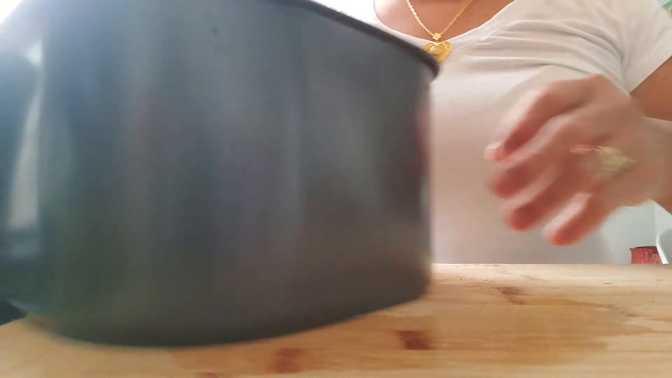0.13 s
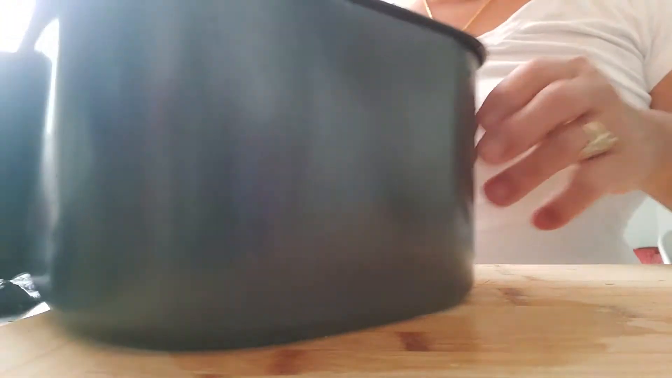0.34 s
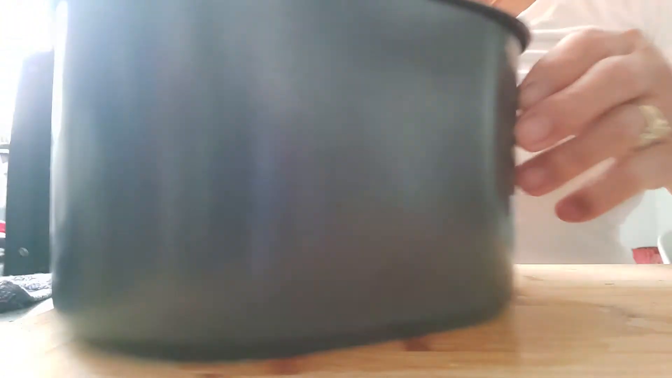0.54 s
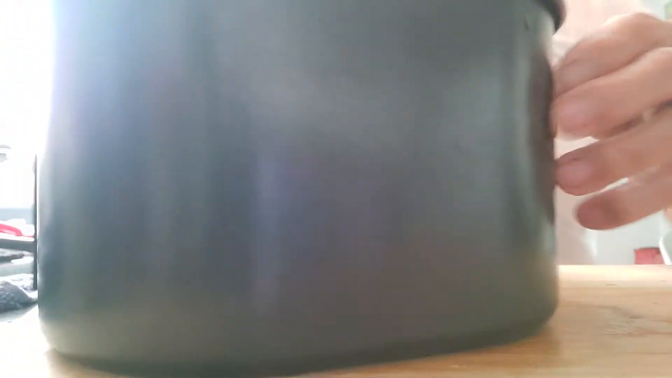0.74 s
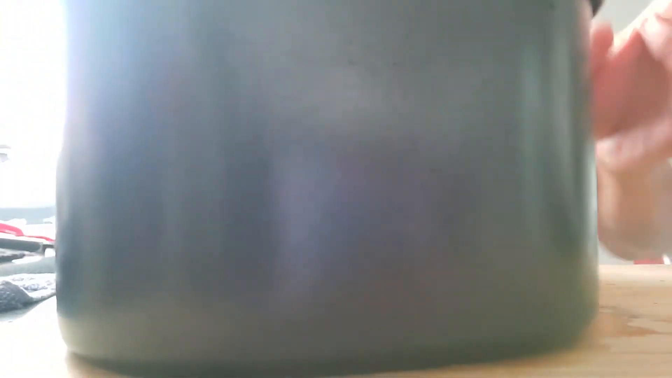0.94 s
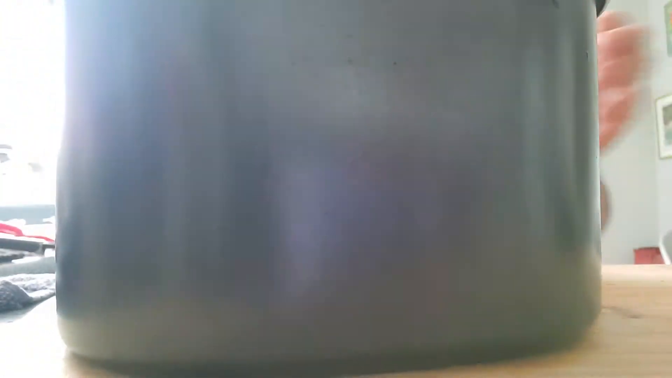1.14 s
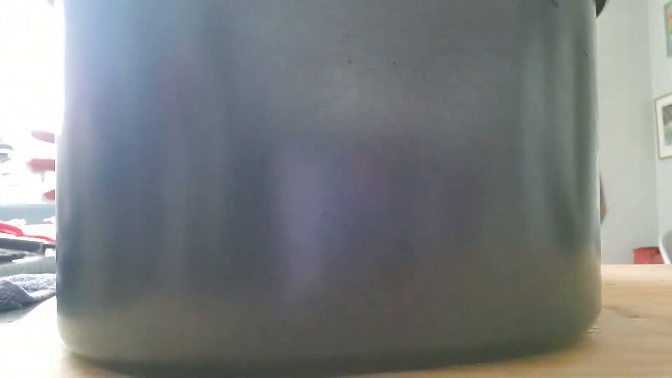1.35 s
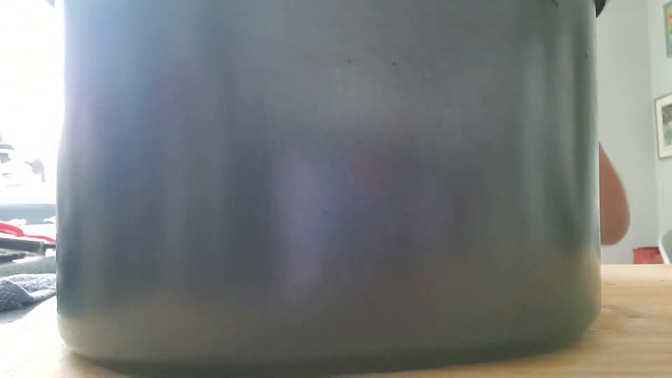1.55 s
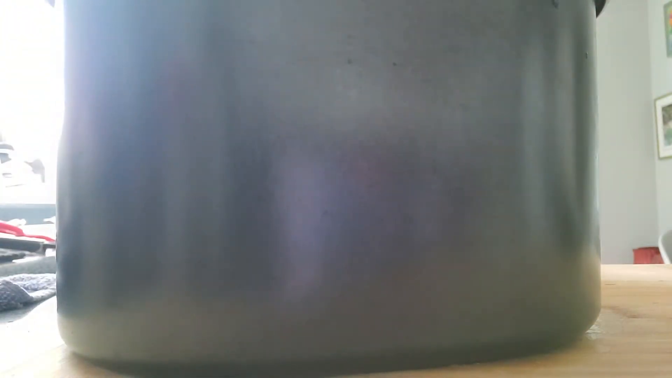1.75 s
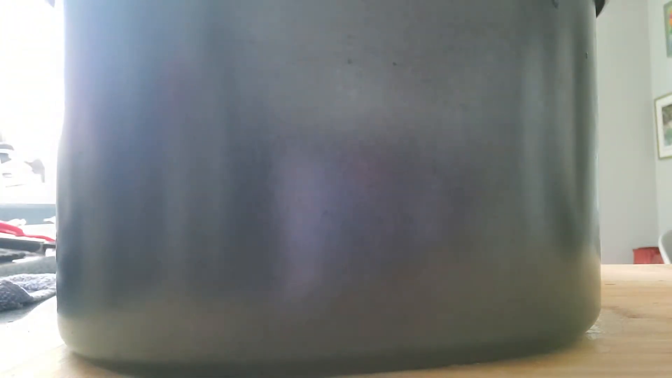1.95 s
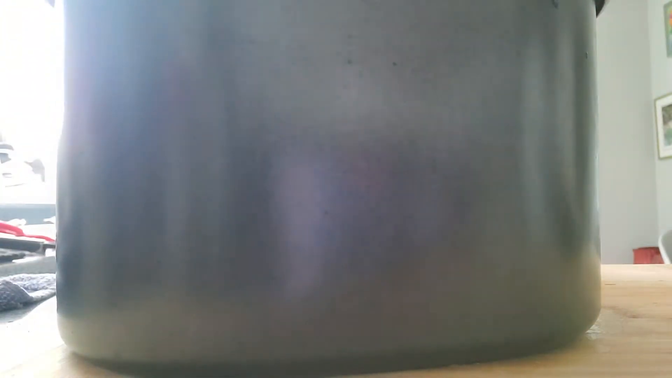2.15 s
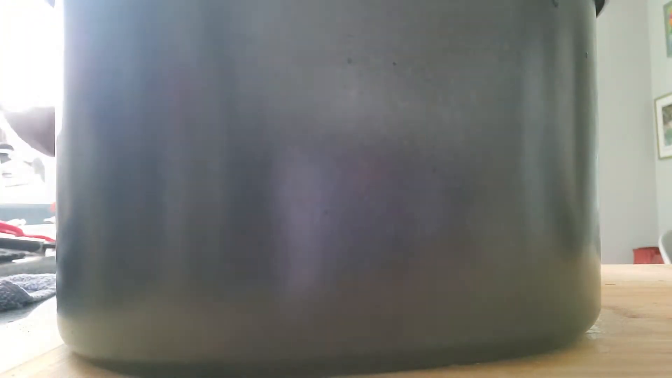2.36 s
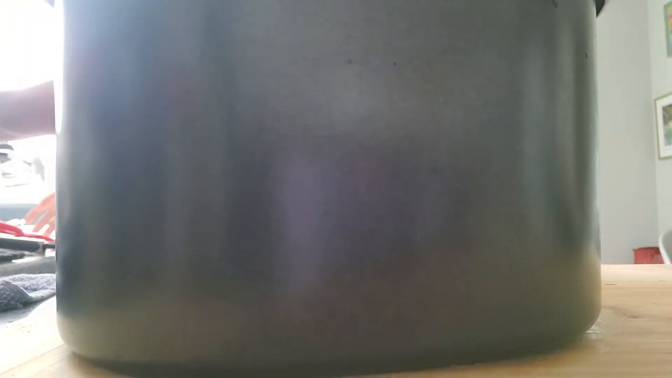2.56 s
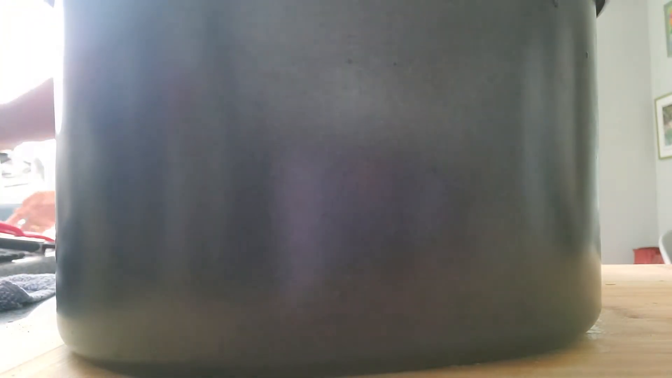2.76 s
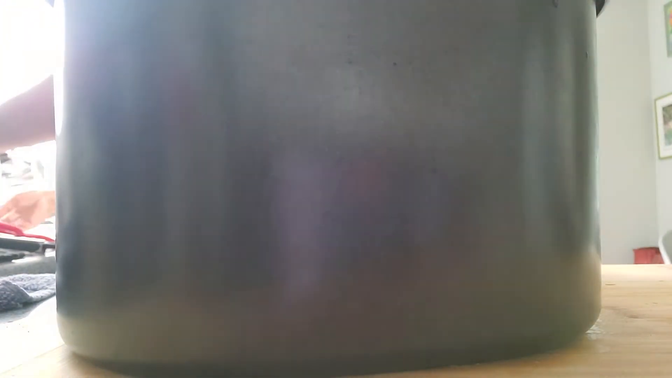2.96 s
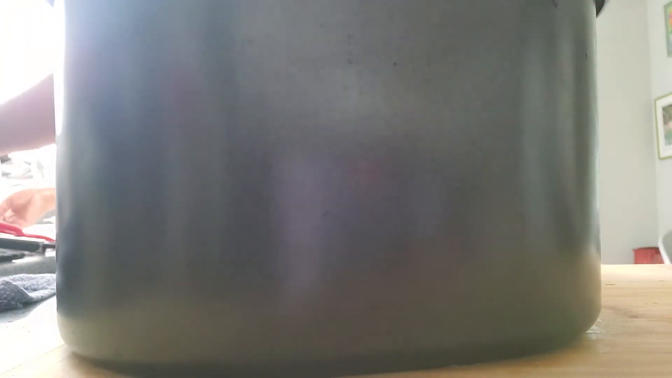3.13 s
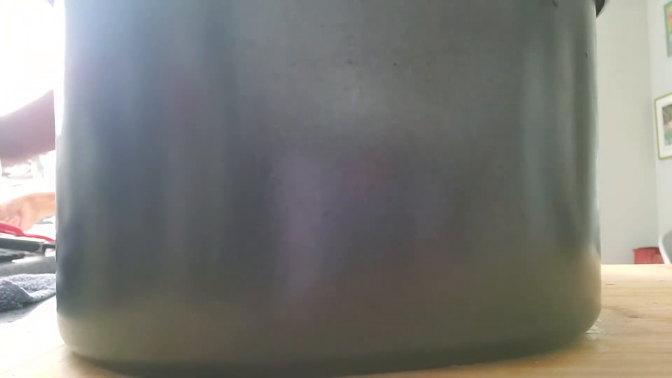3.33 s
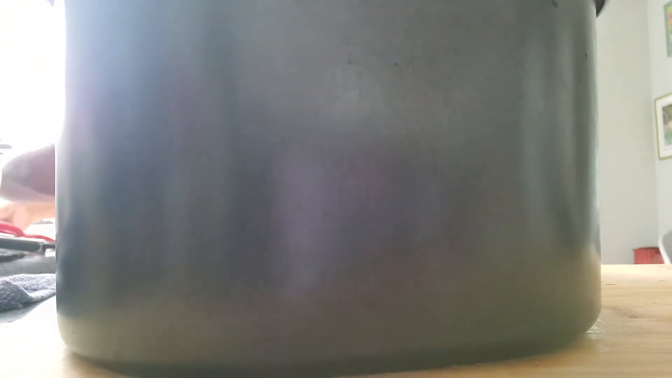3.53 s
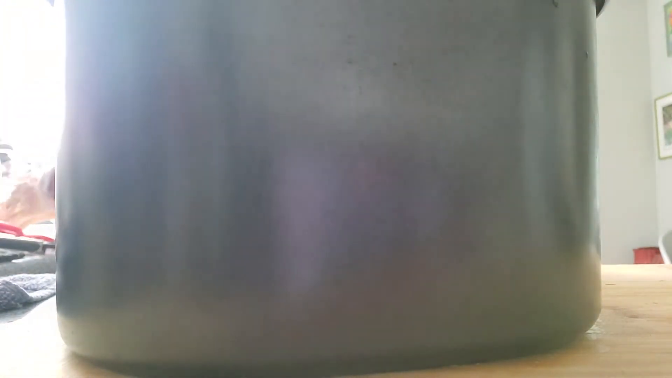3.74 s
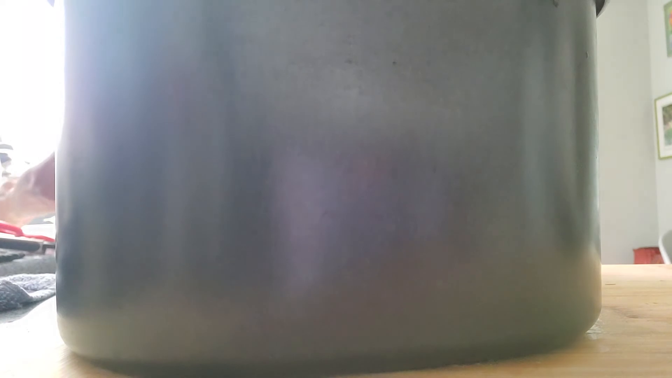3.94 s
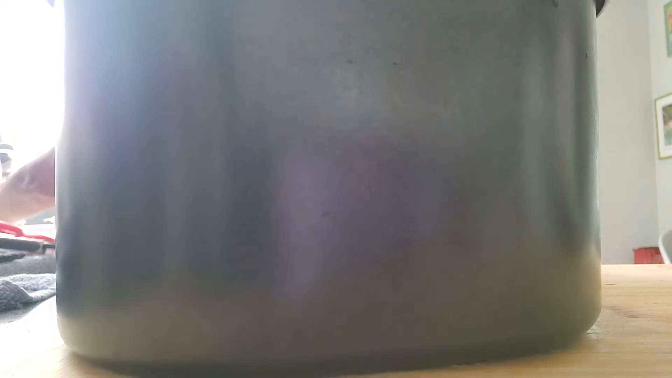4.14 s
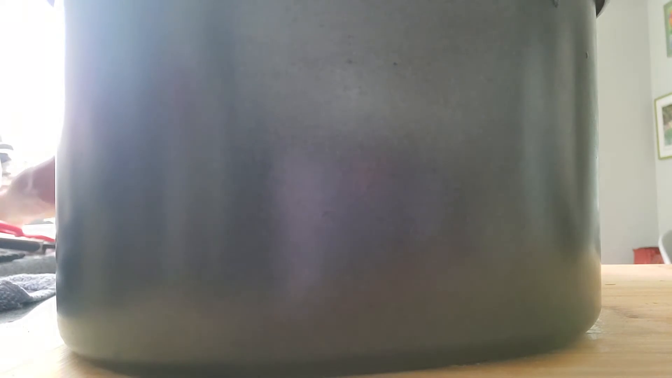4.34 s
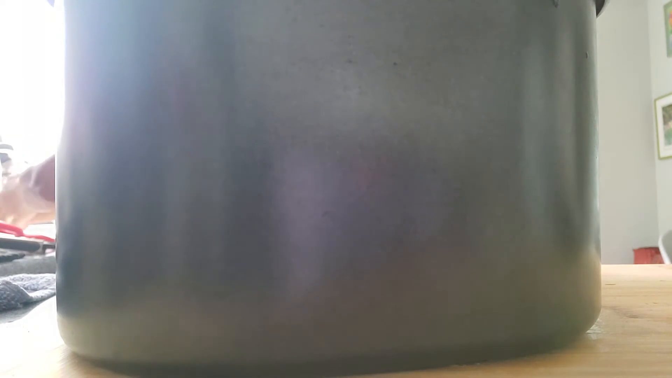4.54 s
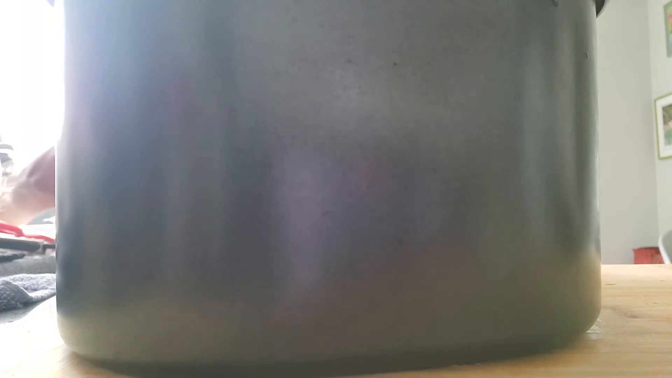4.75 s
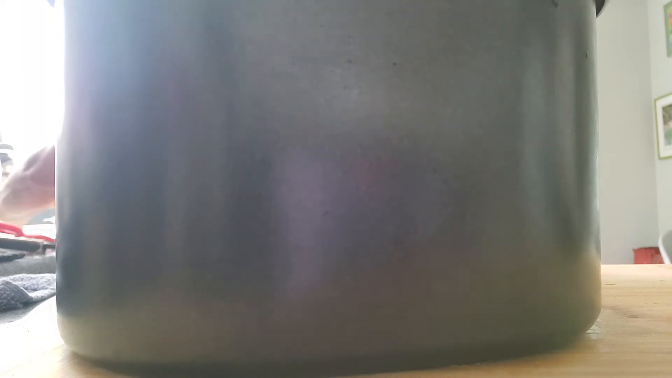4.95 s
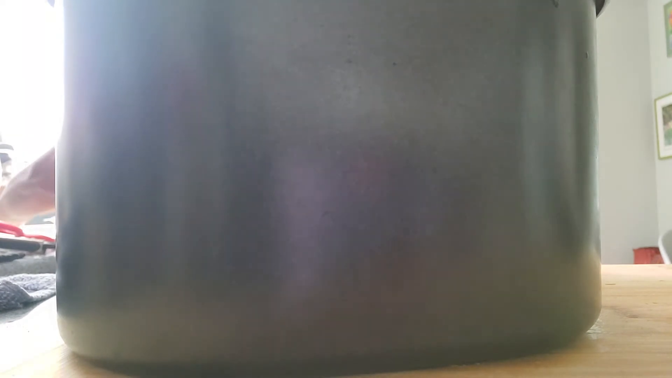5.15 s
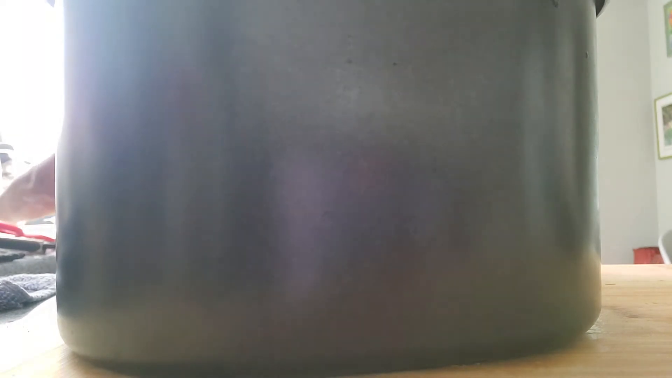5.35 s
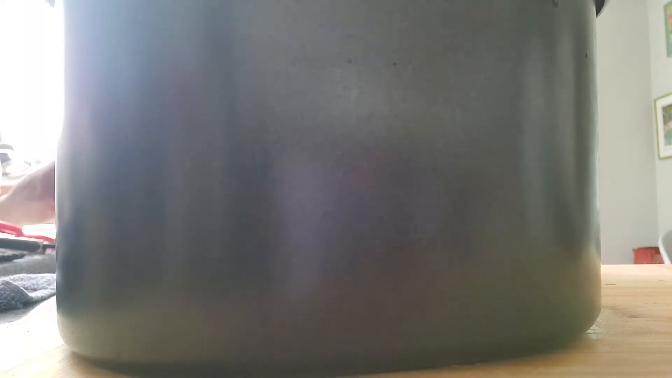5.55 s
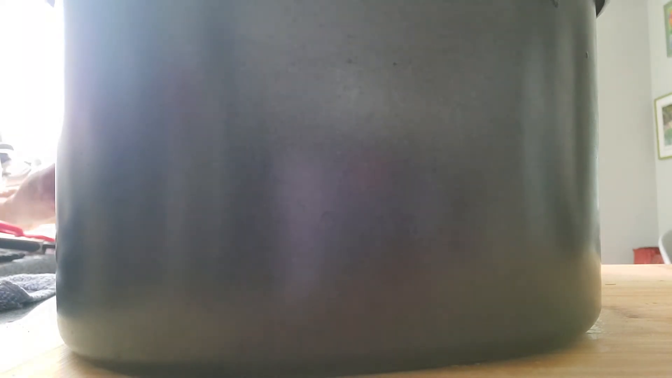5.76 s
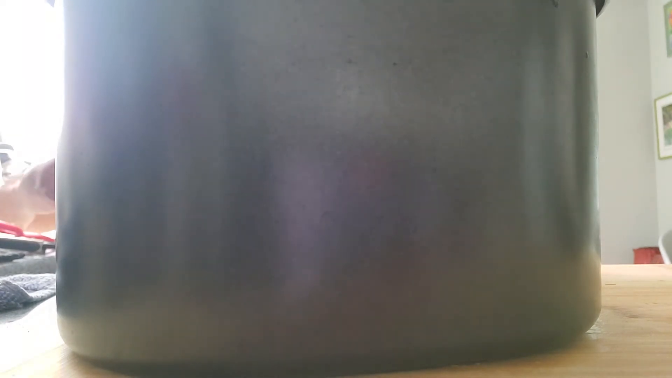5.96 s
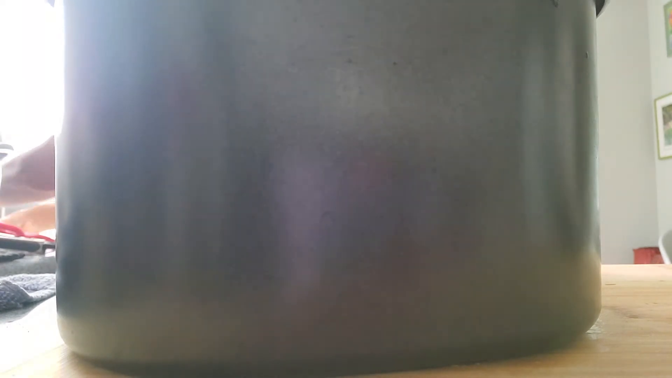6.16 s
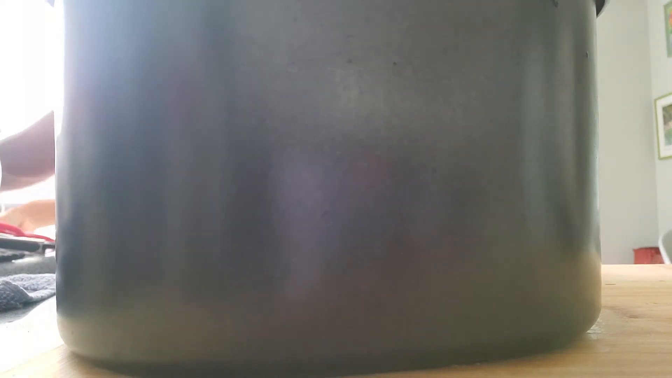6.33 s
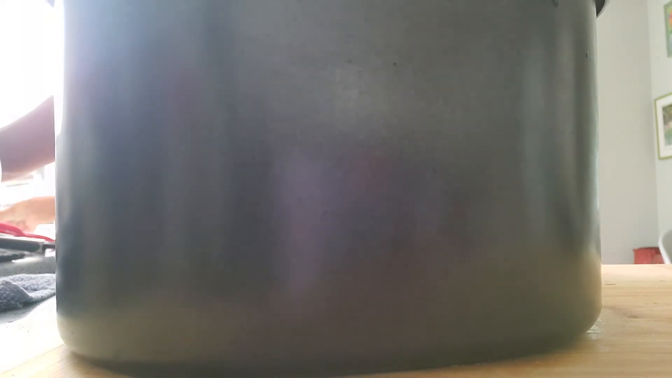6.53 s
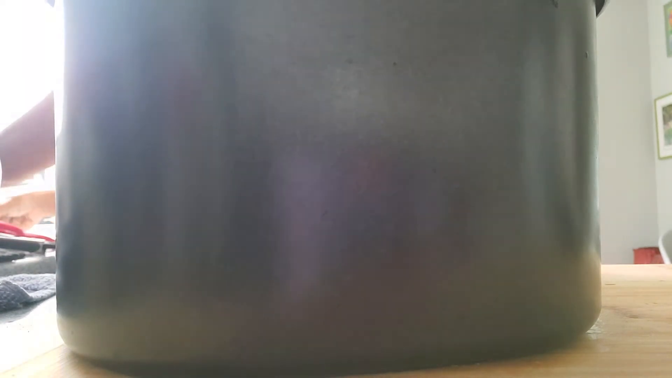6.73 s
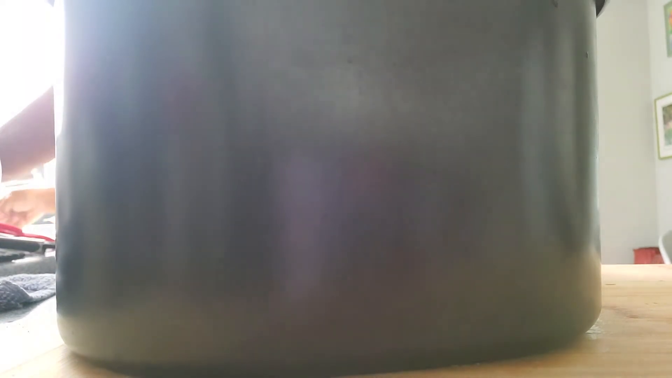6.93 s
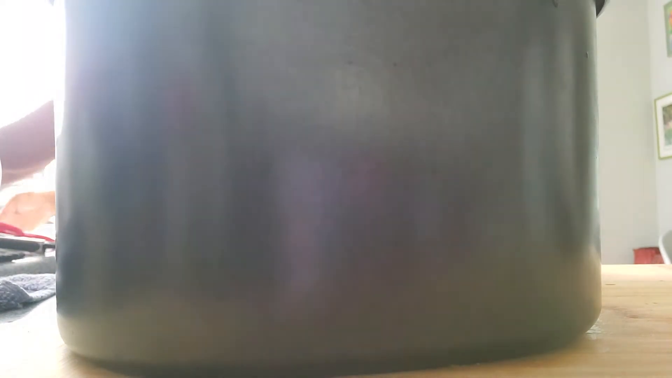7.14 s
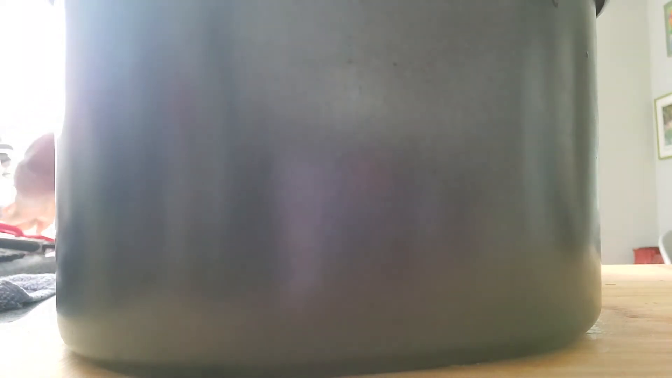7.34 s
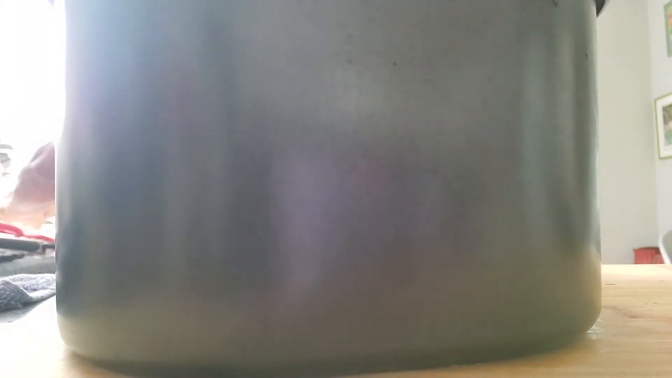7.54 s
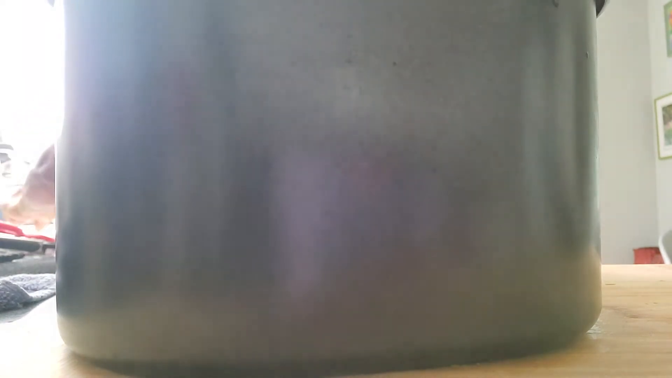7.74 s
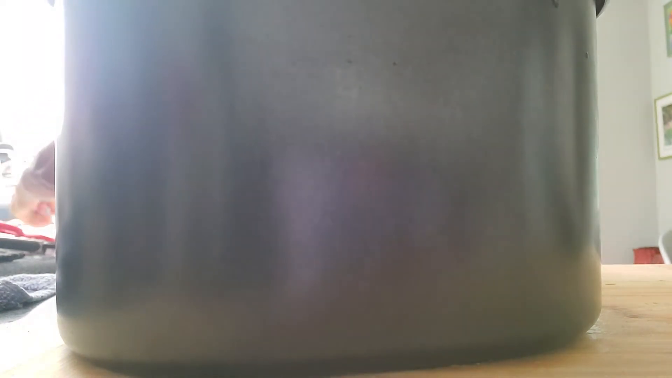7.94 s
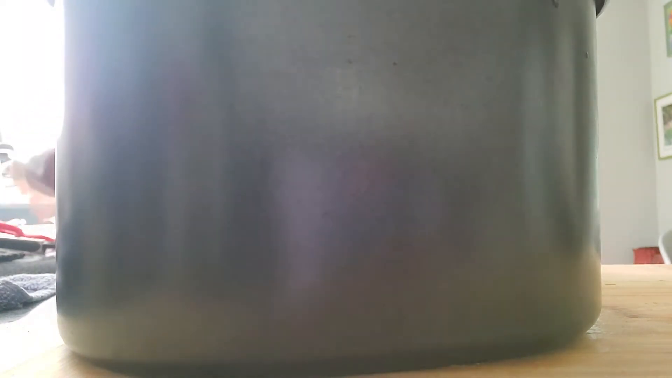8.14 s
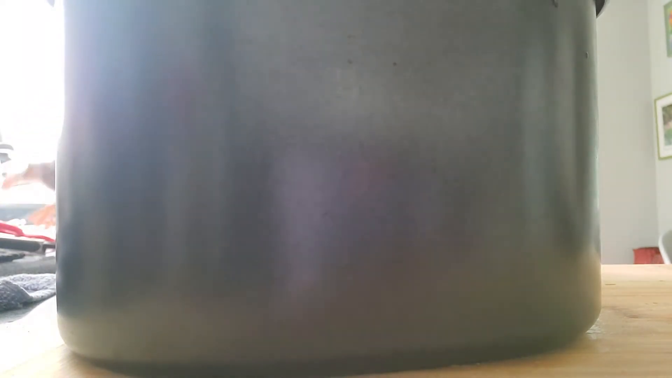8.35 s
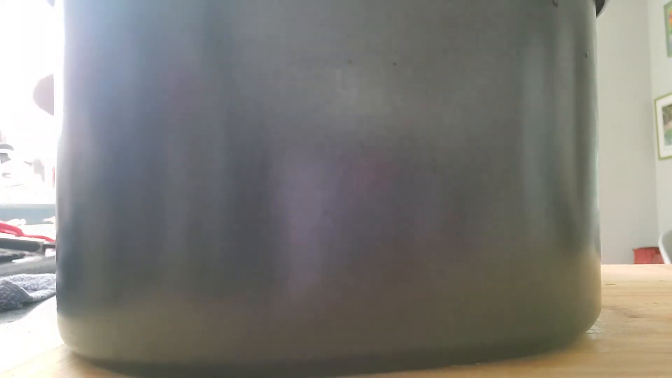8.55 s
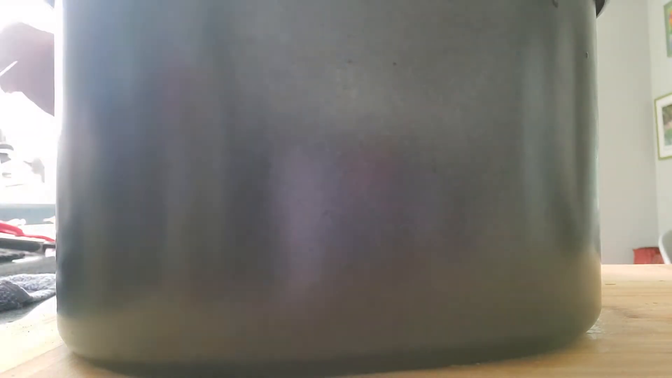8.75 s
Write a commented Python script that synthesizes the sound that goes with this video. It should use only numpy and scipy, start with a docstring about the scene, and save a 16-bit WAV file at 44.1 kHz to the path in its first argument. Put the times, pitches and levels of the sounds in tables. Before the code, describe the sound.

A kitchen with a steady low appliance hum and fan noise throughout. From 0 to 0.7 s a metal basket, very close, is pushed over a wooden counter with quiet scrapes and small ticks. At 0.72 s it knocks down hard: a loud, dull metallic clank with a woody crack and low boom, tiny follow-up contacts, a coarse slide until about 1.1 s and a short juddering groan near 1.0 s. The level ducks for about a second. At 1.55 s a dull double bump sounds across the room; a faint rustle follows around 2 s. At 2.9 s, farther left, a tap opens with hissing spurts and a tiny very high squeal. Water runs softly, with bright spray, patter and bubbly splashes over hands, until a hiss and short wavering whine shut it at 6.6-6.85 s. Drips fade by 7.5 s, leaving hum, low swells and very faint distant chirps.

```python
"""A metal air fryer basket, close to the microphone, is pushed over a wooden counter, knocks down hard and
slides to rest: slips and contacts ring its modes. Farther off, mostly to the left, a tap opens with a
squeal, water runs and splashes over hands, and the tap shuts with a whine: filtered grains, edge tones
and rising bubbles. An appliance hums throughout as steady tones over noise; faint chirps come from far away.
The recorder's limiter ducks for about a second after the knock."""
import sys
import numpy as np
from scipy import signal
from scipy.fft import rfft, irfft, next_fast_len
from scipy.io import wavfile
from scipy.ndimage import uniform_filter1d, minimum_filter1d, map_coordinates

SR = 44100
rng = np.random.default_rng(int(sys.argv[2]) if len(sys.argv) > 2 else 0)


def inscribe(sig):
    """Save sig as 16-bit PCM at rate SR to the path in sys.argv[1].

    A 1-D sig is mono; a 2-D sig holds one channel per row.
    Samples are clipped to [-1, 1] before scaling.
    """
    pcm = np.round(np.clip(np.atleast_2d(sig).T, -1, 1) * 32767)
    wavfile.write(sys.argv[1], SR, pcm.astype(np.int16))


N = 387617
TIME = np.arange(N) / SR
TOP_HZ = 15850  # the recorder keeps nothing above this

# Contacts of the basket's base with the wood. Each row: time in seconds, then ring, crack and grit in dB.
CONTACTS = [(0.082, -42, -46.5, -45.5), (.341, -46, -45.5, -42), (.693, -33, -43, -39.5),
            (.719, 1.5, -2, -39), (.7225, -10.5, -12, -35), (0.7438, -12, -23, -49.5),
            (0.7552, -14.5, -23.5, -30.5), (0.804, -20.5, -42, -59), (.977, -26.5, -34, -37)]
# Colour of grit ground under the base. Each row: frequency in Hz, relative level in dB per Hz.
GRIT_TONE = [(1470, -36), (2500, -9.5), (2700, 0), (2850, -9.5), (3100, -2), (3950, -7), (4300, -3.5),
             (4700, -11), (6710, -11.5), (10500, -9), (11300, -5), (12200, -9.5), (15800, -7)]
# Flow of water through the tap. Each row: time in seconds, level in dB.
FLOW = [(2.86, -8), (2.9, -4.5), (3.15, -4.5), (3.25, -1.5), (6.6, -3), (6.85, -1), (7.0, -6), (7.5, -16.5)]
# Splashes and last drips. Each row: time in seconds, reference peak in dB, central bubble pitch in Hz,
# spray in dB.
SPLASHES = [(3.4158, -48, 5700, -55.5), (3.7553, -53, 5790, -60), (3.9504, -41.5, 3330, -60.5),
            (3.9933, -46, 5460, -59.5), (4.0916, -41.5, 4760, -61.5), (4.5775, -46, 4520, -60),
            (4.9093, -44, 3280, -57.5), (5.0694, -51, 6300, -62), (5.6262, -45.5, 6300, -48),
            (6.0482, -52, 6770, -54.5), (6.1938, -49.5, 6100, -64), (6.2194, -50, 5720, -62.5),
            (6.4359, -38.5, 5180, -55), (6.6189, -48, 5500, -56), (7.005, -47, 8100, -56.5),
            (7.039, -46.5, 3480, -70.5), (7.2601, -40, 4180, -58), (7.414, -39, 3510, -63)]
# Stereo lean of the sink, of the basket by the microphone and of the room around.
# Each row: frequency in Hz, left minus right in dB.
LEFTWARD = [(100, 6), (400, 13), (700, 5), (1300, -1), (2400, 12), (8000, 15.5), (15000, 18.5)]
CLOSE = [(100, -3), (400, 1.5), (650, 9), (1300, -1), (2400, 7.5), (8000, 12.5), (15000, 16.5)]
AROUND = [(60, 1), (200, 1.5), (400, -0.65), (700, 2.2), (3000, 3.2), (15000, 2)]


def amp(db):
    """Decibels to gain."""
    return np.exp(np.asarray(db) * (np.log(10) / 20))


def unit(x):
    """Scale to rms 1, for a pair the rms of its mid."""
    return x / np.sqrt(np.mean(np.atleast_2d(x).mean(0) ** 2) + 1e-20)


def along(points, hz):
    """Interpolate (Hz, value) points on a log frequency axis."""
    f, v = np.transpose(points)
    return np.interp(np.log(hz + 1), np.log(f + 1), v)


def level(rows):
    """Gain per sample from (s, dB) rows; silent outside them."""
    s, db = np.transpose(rows)
    return amp(np.interp(TIME, s, db)) * (TIME >= s[0]) * (TIME <= s[-1])


def wobble(rate, size=N):
    """A smooth random curve, rate knots a second."""
    steps = np.arange(0, size * rate / SR + 1, .25)
    knots = rng.standard_normal(int(size * rate / SR) + 4)
    return np.interp(TIME[:size] * rate, steps, map_coordinates(knots, [steps]))


def filtered(x, response):
    """x times a response of frequency."""
    m = next_fast_len(N + SR // 4)
    return irfft(rfft(x, m) * response(np.fft.rfftfreq(m, 1 / SR)), m)[..., :N]


def fade(t, t60):
    """Exponential decay by 60 dB in t60 seconds."""
    return np.exp(-np.log(1000) * t / t60)


def lagged(x, seconds):
    """Follow x with a time constant."""
    keep = np.exp(-1 / (seconds * SR))
    return signal.lfilter([1 - keep], [1, -keep], x)


def bursts(times, dbs, t60, rise):
    """An envelope that rises fast at each time and dies away."""
    out, t = np.zeros(N + SR), np.arange(SR // 2) / SR
    for s, db in zip(times, dbs):
        out[round(s * SR):][:len(t)] += amp(db) * fade(t, t60) * (1 - np.exp(-t / rise))
    return out[:N]


def swells(rows, axis=2, power=1):
    """Strokes whose speed rises and falls as half a sine; gain from one dB column."""
    out = np.zeros(N + 2 * SR)
    for row in rows:
        start, length, db = row[0], row[1], row[axis]
        arc = np.abs(np.sin(np.linspace(0, np.pi, round(length * SR))))
        out[max(round(start * SR), 0):][:len(arc)] += (amp(db) * arc ** power) ** 2
    return np.sqrt(out[:N])


def grains(rate, spread_db, size):
    """Two trains of tiny random impulses of uneven size; plain noise when very dense."""
    hit = rng.random(size) < rate / SR
    return rng.standard_normal((2, size)) * hit * amp(spread_db * rng.uniform(-1.4, 1.7, size))


def placed(envelope, spectrum, balance, rate=SR, spread_db=0, flutter_db=0):
    """Coloured stereo grains whose level follows the envelope and flutters around it."""
    # Likeness of left and right at the microphone. Each row: frequency in Hz, correlation (1 is identical).
    likeness = [(60, 0.97), (200, 0.87), (500, 0.48), (1000, .2), (2000, 0.043)]
    start, end = np.flatnonzero(envelope)[[0, -1]]
    size, out = end - start, np.zeros((2, N))
    m = next_fast_len(size, True)
    hz = np.fft.rfftfreq(m, 1 / SR)
    alike = np.clip(along(likeness, hz), -1, 1)
    mid, side = rfft(grains(rate, spread_db, m)) * np.sqrt([1 + alike, 1 - alike])
    tone, lean = amp(along(spectrum, hz)), amp(along(balance, hz) / 2)
    left, right = (mid + side) * tone * lean, (mid - side) * tone / lean
    pair = unit(irfft([left, right], m)[:, :size])
    out[:, start:end] = pair * envelope[start:end] * amp(flutter_db * wobble(45, size))
    return out


def sung(drive, modes):
    """Light metal modes following a drive: narrow lines with randomly wavering pitch."""
    width_hz = 45
    lines = 0
    for hz, db in modes:
        phase = 2 * np.pi * np.cumsum(hz + width_hz * wobble(400)) / SR
        lines = lines + amp(db) * np.sin(phase)
    return drive * lines


def mottled(x, depth_db):
    """Every droplet has its own pitch: short patches in time and frequency swell or drop out."""
    z = signal.stft(x, nperseg=256)[2]
    field = uniform_filter1d(rng.standard_normal(z.shape[1:]), size=6, axis=0)
    field = uniform_filter1d(field, size=5, axis=1)
    gain = amp(depth_db * np.clip(field / field.std(), -2.5, 2.5))
    return signal.istft(z * gain / np.sqrt(np.mean(gain ** 2)), nperseg=256)[1][:, :N]


def background():
    """An appliance's steady tones over fan noise and a low rumble with slow swells."""
    # Appliance tones. Each row: frequency in Hz, mean rms level in dB.
    tones = [(177.6, -60.5), (236.9, -64.5), (419.9, -56.5), (721.4, -74), (1125, -73), (1389, -83)]
    # Fan noise. Each row: frequency in Hz, relative level in dB per Hz.
    air_tone = [(20, -24.5), (52, -5), (95, -5.5), (140, -5.5), (170, 3), (240, -7.5), (290, -10.5),
                (480, -16.5), (800, -17), (1150, -22), (1800, -37), (3300, -43), (6000, -50),
                (15800, -48.5)]
    # Low swells in the rumble. Each row: start in seconds, length in seconds, level in dB.
    thumps = [(0, 0.2, -45.5), (2.85, .25, -57), (5.49, .13, -49), (6.62, .26, -53), (8.0, 0.87, -53.5)]
    rumble_db, wander_db = -56.5, 3
    drift = wobble(3.3)
    hum = 0
    for hz, db in tones:
        hum = hum + np.sqrt(2) * amp(db) * np.sin(hz * (2 * np.pi * TIME + .0003 * drift))
    low = np.hypot(amp(rumble_db + wander_db * wobble(5.1)), swells(thumps))
    rumble = placed(low, [(15, -30.5), (42, -0.5), (60, -1.0), (90, -19.0), (300, -61)], AROUND)
    air = placed(np.full(N, amp(-52.0)), air_tone, AROUND)
    return hum * amp(-0.02 + 0.62 * wobble(3.3)) + rumble + air


def ring(force):
    """The basket's modes driven by a force; neighbouring modes swing in opposite senses."""
    # Basket on the counter. Each row: frequency in Hz, left level in dB, right level in dB, t60 in seconds.
    modes = [(76, -14.5, -16.5, 0.43), (110.4, -12, -15.5, 0.18), (183.2, -10, -13.5, .18),
             (315, -15.5, -9, .05), (377.5, -16, -17, 0.16), (413.6, -18.5, -8.5, 0.14),
             (504, -14, -16.5, 0.073), (576, -9, -17.5, .2), (733, -6, -13.5, 0.027),
             (856, -22.5, -26.5, .17), (914, -14, -17, 0.065), (1010, -10.5, -8.5, 0.11),
             (1148, -14.5, -4.5, 0.03), (1350, -21.5, -16, 0.069), (1523, -24, -17, 0.069),
             (2010, -16, -18, .03), (2320, -26, -35.5, .08), (2745, -34.5, -33.5, .1),
             (3300, -25.5, -36.5, .05), (4480, -42, -46.5, 0.13)]
    t = np.maximum(np.arange(SR // 2) / SR - [[.00022], [0]], 0)  # the right microphone is nearer
    body = 0
    for k, (hz, left, right, t60) in enumerate(modes):
        mode = amp([[left], [right]]) * np.sin(2 * np.pi * hz * t) * fade(t, t60)
        body = body + (-1) ** k * mode
    sound = signal.fftconvolve(force[None, :np.flatnonzero(force)[-1] + 1], body, axes=1)
    return np.pad(sound, ((0, 0), (0, N - sound.shape[1])))


def slide(strokes, tone, ring_db):
    """Dense small slips on the wood grain hiss and keep the basket and its rim ringing."""
    # Singing rim. Each row: frequency in Hz, level in dB against the grit before the stereo lean.
    rim_modes = [(2720, -15.5), (3270, -18.5), (4300, -14.5), (11350, -17.5)]
    rub = swells(strokes)
    grind = swells(strokes, axis=3, power=1.6)  # grit follows the sliding speed to this power
    scrape = placed(rub, tone, CLOSE, rate=5000, spread_db=-1, flutter_db=3.2)
    grit = placed(grind, GRIT_TONE, CLOSE, rate=5100, spread_db=-1.0, flutter_db=0.5)
    rim = sung(grind, rim_modes) * amp([[5], [-1]])
    body = ring(amp(ring_db) * rub * rng.standard_normal(N))
    return scrape + grit + rim + body


def basket_slides():
    """The basket is shoved on one edge up to the knock, then slides flat on its base."""
    # Shoves on the edge, slides on the base.
    # Each row: start in seconds, length in seconds, scrape in dB, grit in dB.
    shove_strokes = [(0, 0.41, -53, -56), (.325, .05, -42, -46), (.34, 0.18, -50, -53.5),
                     (.45, .29, -56.5, -64), (.61, .13, -49.5, -61.5), (.683, .042, -38.5, -45.5)]
    flat_strokes = [(.81, .28, -35.5, -48.5), (.972, .05, -45, -52.5)]
    # Colour of the edge, then of the flat base, on wood. Each row: frequency in Hz, relative dB per Hz.
    edge_tone = [(150, -35), (250, -2.5), (373, -7), (414, 2), (449, -19.5), (570, 0.5), (626, -18.5),
                 (705, -14), (908, -14.5), (1090, -7.5), (1180, -9.5), (2210, -23.5), (2600, -26),
                 (6000, -33.5), (7800, -55.5), (13200, -120)]
    flat_tone = [(88, -39), (150, -4), (298, -18), (419, -24), (441, -33), (571, 1), (655, -20),
                 (861, -9.5), (906, -18.5), (1710, -18.5), (2490, -26), (3280, -28.5), (6840, -45),
                 (9000, -44), (11700, -67), (19800, -120)]
    return slide(shove_strokes, edge_tone, ring_db=-36) + slide(flat_strokes, flat_tone, ring_db=-26)


def knocks():
    """Each contact rings the basket, cracks on the wood and grinds a little grit."""
    # Crack of metal on wood. Each row: frequency in Hz, relative level in dB per Hz.
    crack_tone = [(60, -21), (200, 0.5), (1200, 4.5), (1800, -9), (3200, -14.5), (5000, -27.5), (8000, -42),
                  (15000, -44.5)]
    s, ring_db, crack_db, grit_db = np.transpose(CONTACTS)
    force = np.bincount(np.round(s * SR).astype(int), amp(ring_db), N)
    crack = placed(bursts(s, crack_db, t60=0.017, rise=0.00026), crack_tone, CLOSE)
    grit = placed(bursts(s, grit_db, t60=0.046, rise=.002), GRIT_TONE, CLOSE)
    return ring(force) + crack + grit


def thud():
    """The knock sets the wooden counter booming: a decaying burst of low noise."""
    tone = [(25, -45), (45, -26.0), (70, -7), (110, -5.5), (155, 1), (250, -12), (430, -10.0),
            (600, -25.5), (1500, -49.0)]
    knock_s = CONTACTS[3][0]
    return placed(bursts([knock_s], [-22], t60=.7, rise=.008), tone, AROUND)


def judder():
    """At the last contact stick and slip lock onto one mode of the base as it stops."""
    mode_hz, jitter = 585, .012  # jitter is a fraction of the pitch
    phase = 2 * np.pi * np.cumsum(mode_hz * (1 + jitter * wobble(160))) / SR
    envelope = bursts([CONTACTS[-1][0]], [-22], t60=0.36, rise=0.0035)
    return envelope * np.sin(phase) * amp([[0], [-10]])


def bumps():
    """Something set down across the room: a dull double knock of filtered noise."""
    # Each row: time in seconds, level in dB.
    touches = [(1.544, -41.5), (1.583, -51.5)]
    tone = [(250, -32.5), (480, 0.5), (1050, -1), (1500, -17.0), (2500, -35.0), (5000, -48), (12000, -56.5)]
    return placed(bursts(*np.transpose(touches), t60=0.25, rise=0.0013), tone, AROUND)


def sleeve():
    """A sleeve rustles on the way to the tap: swelling, fluttering noise."""
    # Each row: start in seconds, length in seconds, level in dB.
    rustles = [(1.9, 0.4, -73.5), (2.35, 0.082, -68.5), (2.44, 0.4, -89.5)]
    tone = [(1200, -15), (2400, -5.5), (3300, 3.5), (5000, -7), (15000, -17.5)]
    return placed(swells(rustles), tone, LEFTWARD, flutter_db=2.0)


def chirps():
    """Short blurred notes from far away swell and fade, their pitch wavering."""
    # Each row: middle of the note in seconds, mean pitch in Hz, peak level in dB.
    notes = [(2.43, 1165, -61.5), (2.599, 1417, -64), (5.1, 1180, -67), (6.279, 1140, -59.5),
             (6.93, 1640, -70.5), (7.76, 1495, -66), (7.87, 2290, -68.5), (8.15, 1156, -66),
             (8.24, 2300, -68.5), (8.62, 1440, -67.5)]
    t = np.arange(SR // 4) / SR
    out = np.zeros(N + SR)
    for s, hz, db in notes:
        phase = 2 * np.pi * np.cumsum(hz * (1 + 0.035 * wobble(276, len(t)))) / SR
        out[round(s * SR) - len(t) // 2:][:len(t)] += amp(db) * np.sin(phase) * np.hanning(len(t)) ** 2
    return out[:N]


def water():
    """The jet drums in the sink; its spray and droplets patter and slap off the hands."""
    # Drumming sink, then fine spray. Each row: frequency in Hz, relative level in dB per Hz.
    sink_tone = [(350, -21), (550, 0), (750, 4), (1000, -8.5), (1250, -17), (1400, 1), (1520, -8.5),
                 (1950, -7.5), (2200, -2), (2550, -25.5), (3300, -21), (6000, -32.5)]
    spray_tone = [(2500, -34), (3300, -8.5), (5400, -11), (7300, -7), (9300, -3), (11000, -2), (15200, 2.5),
                  (15800, 0)]
    # Hands pass through the jet. Each row: start in seconds, length in seconds, spray in dB, patter in dB.
    rinses = [(3.28, .38, -63.5, -81), (3.73, .27, -60, -74), (3.96, 0.27, -65.5, -69),
              (4.42, 0.28, -70, -68), (4.98, 0.154, -59.5, -61.5), (5.2, 0.56, -70, -73),
              (5.92, 0.1, -58.5, -64), (6.03, 0.62, -66.5, -70), (6.42, .12, -63.5, -74)]
    # Fine drops spatter on the sink. Each row: time in seconds, relative level in dB.
    spatters = [(3.2592, -39.5), (3.3227, -45.5), (3.4326, -46), (3.6998, -56), (3.7807, -52.5),
                (4.357, -50.5), (4.6453, -52.5), (4.806, -59), (5.014, -44), (5.1977, -50), (5.2285, -52.5),
                (5.285, -52.5), (5.3797, -49.5), (5.4237, -44), (6.28, -70), (6.4987, -46), (6.9546, -52),
                (7.0818, -52.5), (7.1504, -48.5), (7.3665, -48), (8.1648, -57), (8.1939, -61),
                (8.632, -61.5)]
    spray_db, patter_db, wander_db = -77, -81, 6  # the undisturbed jet, against the flow
    flow = level(FLOW)
    drum = placed(flow * amp(-61.5), sink_tone, LEFTWARD, flutter_db=2.5)
    jet = flow * amp(wander_db * wobble(28))
    times, peak_db, _, splash_spray_db = np.transpose(SPLASHES)

    spatter = amp(-5.5) * bursts(*np.transpose(spatters), t60=.13, rise=.003)
    spatter += bursts(times, splash_spray_db, t60=0.123, rise=.003)
    mist = np.hypot(amp(spray_db) * jet + spatter, swells(rinses))
    spray = placed(mist, spray_tone, LEFTWARD, rate=5500, spread_db=2, flutter_db=1.0)

    slaps = amp(-15.5) * bursts(times, peak_db, t60=0.17, rise=0.0016)
    patter = np.hypot(amp(patter_db) * jet + slaps, swells(rinses, axis=3))
    drop_tone = [(2000, -5), (2800, -9), (3400, 4.0), (4200, -2.5), (5400, 0), (9000, -8.0), (14000, -22.5)]
    drops = placed(patter, drop_tone, LEFTWARD, rate=1700, spread_db=-1.5, flutter_db=2.5)
    return drum + mottled(spray + drops, depth_db=6.5)


def jet_hiss():
    """The spout hisses while water runs, most while air is still in the pipe."""
    # Jet coloured by the spout. Each row: frequency in Hz, relative level in dB per Hz.
    jet_tone = [(2700, -6), (3100, -32), (3380, -19), (3700, -17), (4500, 2), (6500, -8), (8000, 11),
                (8700, 12), (9400, 15), (10300, -1), (13000, 5), (15500, -4.5)]
    hiss_db, surge_db = -79.5, -54  # against the flow
    surge_s, surge_t60 = 1.5, 3.5  # seconds; the decay counts from before the flow lets it be heard
    surge = amp(surge_db) * fade(np.abs(TIME - surge_s), surge_t60) * (TIME > surge_s)
    return placed(level(FLOW) * (amp(hiss_db) + surge), jet_tone, LEFTWARD, flutter_db=0.9)


def whistle(rows, tone, jitter, count):
    """An unsteady edge tone at the valve seat; its partials glide through the tap's resonances."""
    s, hz, db = np.transpose(rows)
    out, on = np.zeros(N), (TIME > s[0]) & (TIME < s[-1])
    pitch = np.interp(TIME[on], s, hz) * (1 + jitter * wobble(800)[on])
    phase = 2 * np.pi * np.cumsum(pitch) / SR
    partials = sum(amp(along(tone, k * pitch)) * np.sin(k * phase) for k in range(1, count + 1))
    out[on] = amp(np.interp(TIME[on], s, db)) * partials
    return out


def valve():
    """Water squeezed through the nearly shut valve hisses, whistles, rings the spout and shakes the pipe."""
    # The valve passes its narrow gap. Each row: start in seconds, length in seconds, hiss in dB.
    throttles = [(2.883, 0.033, -46), (2.928, .07, -62), (2.986, .025, -45), (3.155, 0.064, -46),
                 (3.238, 0.098, -60), (6.627, 0.04, -50), (6.66, 0.18, -44.5), (6.825, 0.054, -46)]
    # Colour of the hiss. Each row: frequency in Hz, relative level in dB per Hz.
    hiss_tone = [(1470, -40), (2500, -19), (2810, -33), (3130, -10), (3270, -10.5), (4260, -17),
                 (5320, -7.5), (5980, -19), (6660, -21), (7890, -1), (9870, -10.5), (11300, -7),
                 (13300, -0.5), (14100, -1.5), (15800, -3)]
    # Opening squeal, then closing whine that sags and recovers.
    # Each row: time in seconds, central pitch in Hz, level in dB before tone and stereo lean.
    squeal_path = [(2.92, 11900, -76), (2.935, 13410, -45), (2.945, 14740, -43), (2.965, 15190, -42),
                   (2.98, 14330, -40), (2.995, 12870, -42), (3.02, 12460, -62)]
    whine_path = [(6.67, 2215, -72.5), (6.705, 2090, -52.5), (6.72, 2028, -55), (6.738, 1846, -57),
                  (6.76, 1757, -52), (6.785, 2087, -52), (6.805, 2010, -69), (6.83, 2132, -85)]
    # Resonances met by the whine. Each row: frequency in Hz, gain in dB of a partial there.
    whine_tone = [(1750, -5.5), (1950, -4), (2110, 9.5), (2400, -12), (3650, 2), (4300, -5), (5450, -1),
                  (6700, -19), (8100, 0), (10500, -4), (12700, 6), (15000, 1)]
    # Rings of the spout. Each row: frequency in Hz, level in dB against the lagged hiss before the lean.
    spout_modes = [(4520, -20), (5480, -19.5), (8150, -17.5)]
    attack_s, release_s, spout_t60 = 0.0078, .018, 0.13
    squeeze, t = np.zeros(N), np.arange(SR // 2) / SR
    for s, length, db in throttles:
        attack = 1 - np.exp(-t / attack_s)
        release = np.exp(-np.maximum(t - length, 0) / release_s)
        squeeze[round(s * SR):][:len(t)] += amp(db) * attack * release
    hiss = placed(squeeze, hiss_tone, LEFTWARD, flutter_db=0.5)
    squeal = whistle(squeal_path, [(12000, 8.5), (15000, 8)], jitter=0.037, count=1) * amp([[3], [-15]])
    whine = whistle(whine_path, whine_tone, jitter=.009, count=8) * amp([[4], [-5]])
    spout = sung(lagged(squeeze, spout_t60 / np.log(1000)), spout_modes) * amp([[3], [-6]])
    pipe_tone = [(60, -27), (110, -4.5), (160, 0), (300, -12), (800, -15), (1600, -26), (3000, -50.5)]
    shudder = placed(amp(-7.5) * squeeze, pipe_tone, AROUND)
    return mottled(hiss, depth_db=3.5) + squeal + whine + spout + shudder


def splashes():
    """A slap of water bursts into a cluster of small bubbles rising in pitch; stray drops fall in between."""
    out, t = np.zeros((2, N + SR)), np.arange(SR // 30) / SR
    chance = rng.random(size=(60, 3))
    stray_s, stray_db = 3.7 + 3.85 * chance[:, 0], -63 + 9 * chance[:, 1]
    strays = np.transpose([stray_s, stray_db, 4200 * 5.9 ** chance[:, 2]])
    for s, db, hz in np.vstack([np.array(SPLASHES)[:, :3], strays]):
        splash = np.zeros((2, SR // 4))
        waits = rng.exponential(.011, size=14)
        pitches = rng.normal(.04, .14, len(waits))
        sides = rng.uniform(-np.pi, np.pi, len(waits))  # phase of right against left
        for wait, pitch, side in zip(waits - waits.min(), pitches, sides):
            f = min(hz * np.exp(pitch), TOP_HZ)
            phase = 2 * np.pi * f * t * (1 + 4.1 * t) + np.array([[0], [side]])
            bubble = np.sin(phase) * fade(t, 70 / f)
            splash[:, int(min(wait, .1) * SR):][:, :len(t)] += bubble * fade(wait, 0.18)
        out[:, round(s * SR):][:, :SR // 4] += amp(db + 4.5) * splash / np.abs(splash).max()
    return out[:, :N] * amp([[0], [-10]])


def kitchen(x):
    """The room's answer: noise in which each frequency dies at its own speed."""
    # Each row: frequency in Hz, t60 in seconds.
    decay = [(80, 1), (500, 0.41), (3000, 0.41), (12000, 0.21)]
    hz, t, z = signal.stft(rng.standard_normal((2, SR * 3 // 4)), SR, nperseg=256)
    tail = signal.istft(z * fade(t, along(decay, hz)[:, None]), SR, nperseg=256)[1]
    tail = np.pad(tail / np.linalg.norm(tail[0]), ((0, 0), (SR // 150, 0)))  # the room answers late
    return signal.fftconvolve(x, tail, axes=1)[:, :N]


def scene():
    """The basket is close and dry; the sink is farther off and wetter."""
    hum = background()
    rubbing = basket_slides() + judder()
    blows = knocks() + thud()
    far = bumps() + sleeve() + chirps() + water() + jet_hiss() + valve() + splashes()
    room = kitchen(amp(-15) * blows + amp(-19) * rubbing + amp(-5.5) * far)
    return blows + rubbing + amp(-0.5) * far + room + hum


def limiter(x):
    """The gain drops just ahead of a peak, stays down for a while and then comes back."""
    ceiling, hold_s, release_db_per_s = 0.82, 1.19, 27.5
    over_db = 20 * np.log10(np.maximum(np.abs(x).max(0) / ceiling, 1))
    half = round(hold_s * SR / 2)
    held_db = -minimum_filter1d(-over_db, size=2 * half + 1, origin=half, mode="constant")
    recovery_db = release_db_per_s * TIME
    duck_db = np.maximum.accumulate(held_db + recovery_db) - recovery_db
    return x * amp(-uniform_filter1d(duck_db, size=64, origin=-31))  # the origin looks ahead


def record(dry):
    """The microphone's low cut, the limiter, then the recorder's band limit."""
    low_cut = signal.butter(2, 36, "highpass", fs=SR, output="sos")  # Hz
    heard = signal.sosfilt(low_cut, dry)
    return filtered(limiter(heard), lambda hz: hz < TOP_HZ)


dry = scene()
out = record(dry)
inscribe(out)
```